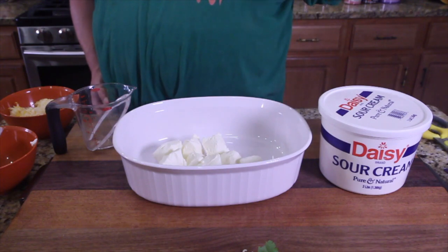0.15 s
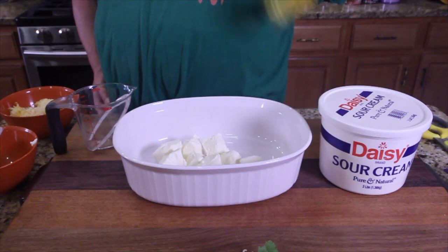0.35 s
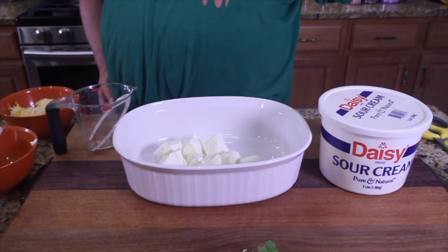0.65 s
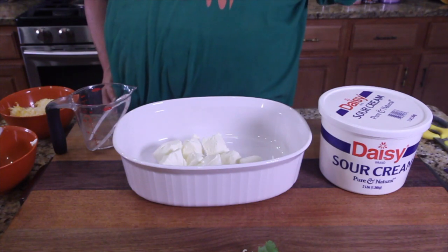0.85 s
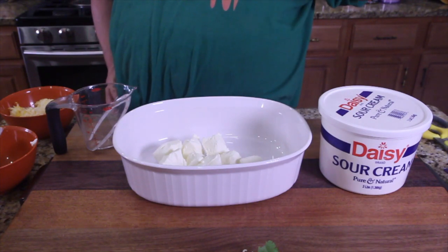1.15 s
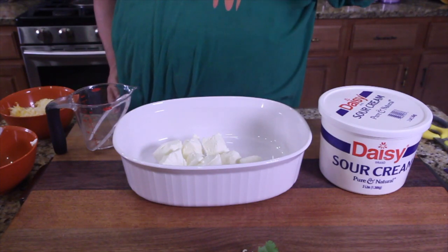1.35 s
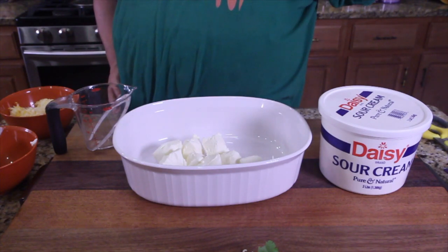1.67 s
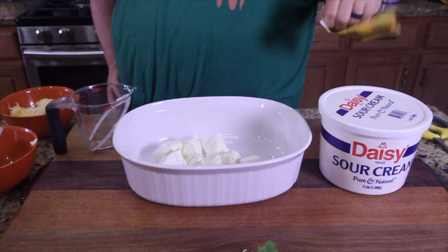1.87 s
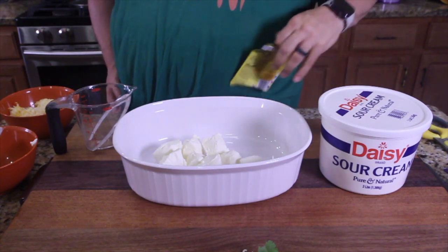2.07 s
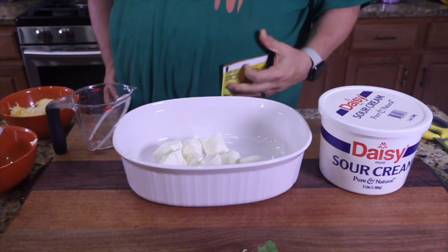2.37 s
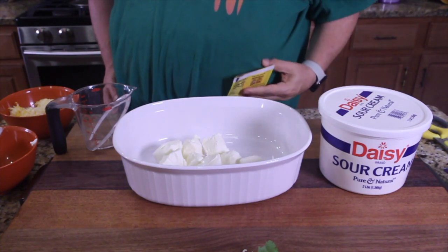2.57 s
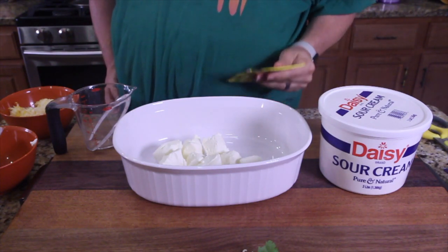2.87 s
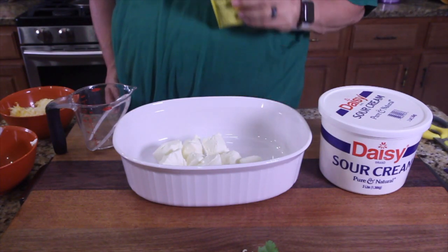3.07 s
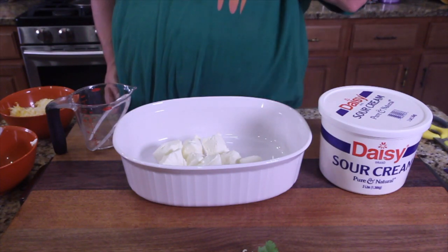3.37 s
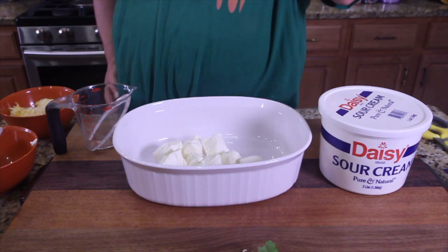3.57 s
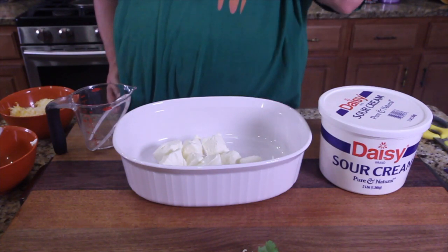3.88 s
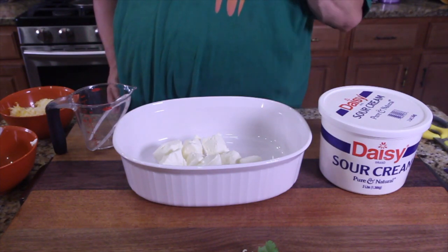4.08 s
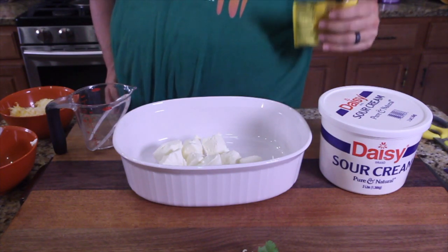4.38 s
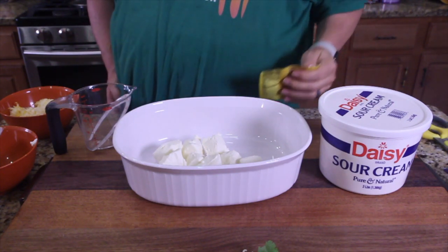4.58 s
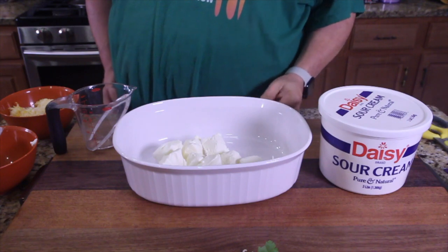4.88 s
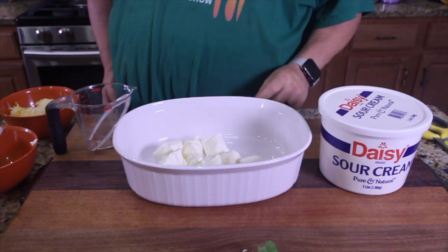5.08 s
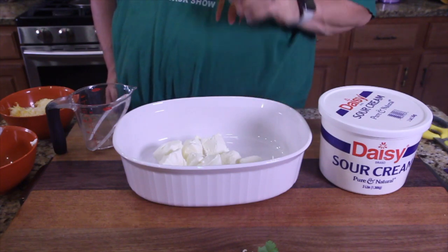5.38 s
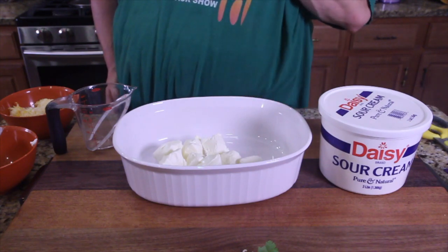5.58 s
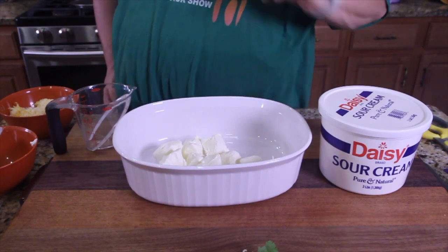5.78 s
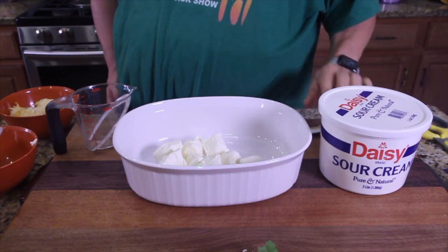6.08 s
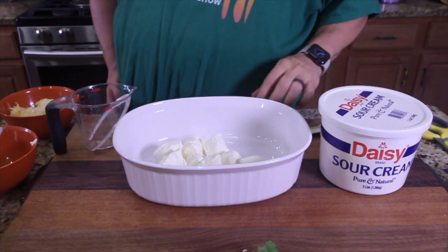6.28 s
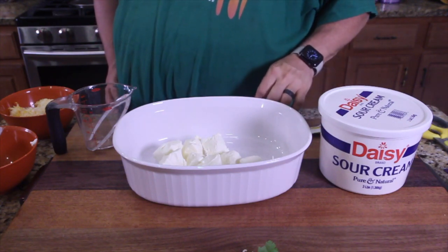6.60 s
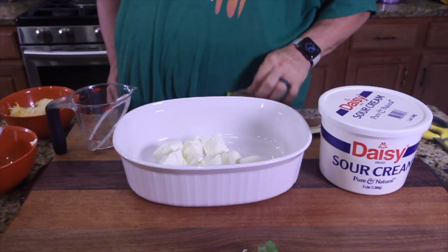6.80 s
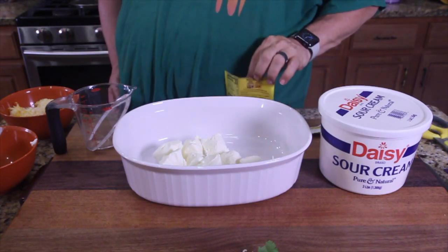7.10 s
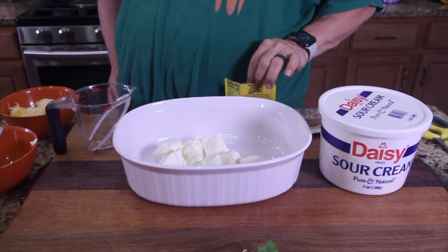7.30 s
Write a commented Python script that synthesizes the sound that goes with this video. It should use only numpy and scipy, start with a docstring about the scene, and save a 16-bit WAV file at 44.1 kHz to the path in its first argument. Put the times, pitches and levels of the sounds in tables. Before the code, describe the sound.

A paper packet of seasoning is shaken quickly for about two seconds, each stroke a sharp snap with a slap of powder inside. Quiet handling follows, with ticking creases and sliding powder, until the packet is torn open in one short, bright rip. A hand softly knocks and brushes a wooden board, and the paper crinkles again. The microphone is close, in a quiet home kitchen.

```python
"""Sharp paper snaps and the slap of powder: a packet is shaken close to one microphone in a home kitchen.
It is then handled quietly, its creases ticking and the powder sliding, and torn open at 4 s with a
bright rasp of parting fibres. As it is put down on the counter, a hand knocks and brushes a wooden
board. Behind it all, the kitchen answers with a short tail over a faint room noise."""
import sys
import numpy as np
from scipy import signal
from scipy.fft import rfft, irfft, next_fast_len
from scipy.io import wavfile

SR = 44100
rng = np.random.default_rng(int(sys.argv[2]) if len(sys.argv) > 2 else 0)


def output_pcm(signal):
    """Save a mono or channel-first signal as 16-bit PCM at the path in sys.argv[1].

    Samples are clipped to [-1, 1] before scaling.
    """
    pcm = np.clip(np.atleast_2d(signal).T, -1, 1) * 32767
    wavfile.write(sys.argv[1], SR, np.round(pcm).astype(np.int16))


N = 328545

# ends of the shake's strokes, up and down in turn: (time [s], level [dB], brightest frequency [Hz])
SHAKE_STROKES = [(0.1274, -8, 8000), (0.3093, -4.5, 4200), (0.4683, -5.5, 8100), (0.6494, -2.1, 5700),
                 (0.8119, -5, 7620), (.998, 0, 5000), (1.1652, -4, 5500), (1.3457, -1.66, 4000),
                 (1.505, -3, 5770), (1.686, 0.35, 3000), (1.8561, -9.5, 6700)]
# resonances of the packet's air pocket and walls: (frequency [Hz], width [Hz], gain [dB])
POCKET_MODES = [(210, 23, -3.5), (298, 52, -4.5), (380, 300, -5), (476, 120, -5), (612, 150, 1.5),
                (1040, 630, -5), (2000, 71, -2.5)]
# spectrum of paper and powder rubbing: (frequency [Hz], level per Hz [dB])
RUSTLE_SPECTRUM = [(71, -53.5), (120, -11.5), (308, -4.5), (445, -4), (670, -8), (773, -6.5), (1340, -6),
                   (1940, -4), (2480, -6), (8310, -5.5), (16000, -15.5)]


def snap_events(up_db=-3, taut_hollow_db=-25.5, buckle_lead_s=.0105, buckle_db=-14, buckle_hz=5000,
                buckle_hollow_db=3):
    """The paper snaps taut after each stroke and buckles before a down stroke ends; lone creases flip."""
    # lone creases, and one snap of fibres within the tear at 4.09 s: (time [s], level [dB], brightest frequency
    # [Hz], push on the hollow pocket [dB])
    creases = [(0.017, -10.5, 8400, -28), (0.1361, -5.5, 7990, -6), (0.2373, -21, 1574, -10),
               (0.2638, -18, 3236, -27.5), (0.356, -10.5, 9650, -36), (0.594, -15.5, 2002, -6),
               (0.7078, -9.5, 6680, -29.5), (0.771, -16.5, 7400, -14), (0.8319, -13, 5430, -17.5),
               (0.9209, -24.5, 1554, 10), (1.076, -14.5, 8920, -25.5), (1.239, -16.5, 2330, -30),
               (1.284, -15.5, 1610, -1), (1.4301, -19, 5180, -8), (1.5902, -15.5, 1800, -28.5),
               (1.6177, -15.5, 1610, -16), (1.632, -17, 1670, -19.5), (1.7485, -13.5, 6860, -24),
               (2.037, -34, 8200, -28), (2.0828, -30, 7600, -6), (2.1472, -27, 1990, 0.5),
               (2.2026, -30.5, 3000, -22), (2.2585, -25.5, 5670, -2), (2.3407, -33, 1930, -9),
               (2.405, -34, 1800, -16), (2.4818, -37.5, 4900, -23), (2.688, -26.5, 6600, -10),
               (2.722, -34, 5000, -19), (2.8198, -38, 1540, -31.5), (3.1582, -30, 6870, -26),
               (3.2294, -31.5, 6100, -10), (3.2969, -24.5, 1720, 1.5), (3.3841, -33.5, 1510, -3),
               (3.47, -32, 2510, -2.5), (3.5716, -40.5, 1950, 14.5), (3.6296, -34.5, 6200, -32.5),
               (3.8233, -25.5, 2360, 4.5), (3.8457, -26, 2300, -4.5), (3.919, -39, 1550, -2),
               (3.9323, -31, 2513, 2.5), (3.9873, -16, 5500, -2.5), (4.01, -27.5, 8600, -13),
               (4.0173, -3, 8260, -10.5), (4.0938, -15, 2740, -26), (4.6206, -46, 6100, -14.5),
               (4.9224, -37.5, 5400, -18), (5.1813, -28, 1580, -22.5), (5.355, -44, 1770, -20),
               (5.6387, -34, 5520, -6), (6.0395, -35.5, 4000, -18), (6.9348, -34.5, 6100, 1.5),
               (6.979, -38, 1820, 1), (6.991, -35, 2510, 5), (7.0336, -31, 7660, -12)]
    taut = [(s, db + up_db * (k % 2 == 0), hz, taut_hollow_db)
            for k, (s, db, hz) in enumerate(SHAKE_STROKES)]
    buckles = [(s - buckle_lead_s, db + buckle_db, buckle_hz, buckle_hollow_db)
               for s, db, _ in SHAKE_STROKES[1::2]]
    return taut + buckles + creases


def snaps(decay_s=0.00067, swell_s=0.00019, ragged=0.89, width_ratio=0.75, broad_db=-8, body_db=21,
          top_hz=11000, puff_db=-36, puff_s=0.005, deep_slope=0.17, uneven_db=4.0, dulling=0.12):
    """Each crease flips raggedly within a millisecond; it thumps the air pocket and puffs air."""
    t = np.arange(512) / SR
    envelope = np.exp(-t / decay_s) * (1 - np.exp(-t / swell_s))
    events = snap_events()
    impulse = t == t[12]
    bursts = (rng.standard_normal((len(events), len(t))) * ragged + impulse) * envelope
    bursts = butterworth(bursts, top_hz)
    puff = amp(puff_db) * t / puff_s * np.exp(1 - t / puff_s) * (1 - t / (2 * puff_s))
    cracks = np.zeros(N + len(t))
    push = np.full((len(POCKET_MODES), N + len(t)), 1e-18)
    # each crease sits elsewhere on the pocket and drives its modes differently
    reach_db = uneven_db * rng.standard_normal((len(events), len(POCKET_MODES)))
    is_deep = np.array(POCKET_MODES)[:, 0] < 500
    for (s, db, hz, hollow_db), burst, own_db in zip(events, bursts, reach_db):
        broad = amp(broad_db + dulling * db) * resonate(burst, 6400, 13000)
        crack = resonate(burst, hz, width_ratio * hz) + broad
        i = round(s * SR)
        cracks[i:i + len(t)] += amp(db) * (crack / np.abs(crack).max() + puff)
        # light creases move only a corner of the pocket and reach its deep tones less
        push[:, i] += amp(db + hollow_db + body_db) * amp(deep_slope * db * is_deep + own_db)
    return cracks[:N] + pocket(push[:, :N])


def landings(slide_lead_s=.073):
    """Every shower of powder as (time [s], strength [dB], rise [ms], t60 [ms])."""
    # the powder shifts as the packet is turned or gripped: (time [s], strength [dB])
    shifts = [(.0144, -35), (2.085, -28.5), (2.139, -29), (2.16, -29.5), (2.241, -23), (2.259, -30),
              (2.678, -33), (2.701, -43), (3.1584, -32), (3.226, -31), (3.2959, -36), (3.824, -32),
              (4.869, -40), (5.184, -37.5), (5.64, -36.5), (5.71, -41), (6.936, -36), (6.991, -25.5),
              (7.0338, -25), (7.047, -33), (7.3318, -37), (7.354, -36)]
    up = [(s, db - 5, 21, 110) for s, db, _ in SHAKE_STROKES[::2]]   # going up, it gathers more slowly
    down = [(s, db + 1, 13, 52) for s, db, _ in SHAKE_STROKES[1::2]]
    slides = [(s - slide_lead_s, db - 15, 13, 43) for s, db, _ in SHAKE_STROKES[1::2]]
    return up + down + slides + [(s, db, 3.1, 80) for s, db in shifts]


def powder_slaps(per_s=4400, spread_db=4.5, trim_db=-14, lag_s=0.002, hollow_db=-5, dulling=0.1,
                 light_hollow_db=4.0):
    """Powder hits the paper as a dense shower that swells and dies."""
    t = np.arange(SR // 2) / SR
    shower = np.zeros(N + len(t))
    for s, db, rise_ms, t60_ms in landings():
        rise_s = rise_ms / 1000
        i = max(round((s + lag_s - rise_s) * SR), 0)
        fall_db = -60 * np.maximum(t - rise_s, 0) * 1000 / t60_ms
        shower[i:i + len(t)] += amp(db + trim_db + fall_db) * np.minimum(t / rise_s, 1) ** 2
    hits = shower[:N] * colour(grains(per_s, spread_db), RUSTLE_SPECTRUM)
    # light showers carry less treble and more of the pocket
    lightness = 1 - (shower[:N] / shower.max()) ** dulling
    hits = hits - lightness * above(hits, 12000)
    return hits + amp(hollow_db + light_hollow_db * lightness) * pocket(hits)


def pocket(drive):
    """The hollow of the packet rings in parallel resonances, with one drive for all or one for each."""
    pushes = np.broadcast_to(drive, (len(POCKET_MODES), N))
    return sum((-1) ** k * amp(db) * resonate(pushes[k], hz, width)
               for k, (hz, width, db) in enumerate(POCKET_MODES))


def rip(per_s=5000, spread_db=2.5, flutter_db=1.0):
    """Fibres part too fast to count: a bright rasp that flutters, only while the tear runs."""
    # the tear running across and its fibres settling: (time [s], level [dB])
    tear = [(4.016, -15), (4.035, -32), (4.09, -30.5), (4.14, -31), (4.18, -42.5), (4.25, -50.5),
            (4.4, -62)]
    # spectrum of tearing paper: (frequency [Hz], level per Hz [dB])
    fibre_spectrum = [(180, -45), (300, -12.5), (593, -10.5), (1030, -9.5), (2570, -7.5), (7950, -2.5),
                      (16000, -11)]
    t = np.arange(N) / SR
    running = (t > tear[0][0]) & (t < tear[-1][0])
    envelope = running * amp(in_time(tear) + flutter_db * drift(60))
    return envelope * colour(grains(per_s, spread_db), fibre_spectrum)


def rustle(per_s=450, spread_db=4.0, clump_db=9.5, hiss_db=2.0, patch_db=1.5, patchier=0.62,
           width_ratio=0.26, brisk_db=-44, fuller_per_db=0.54, fullest_db=3.5):
    """Small creases crackle in clumps over the hiss of sliding powder; duller and patchier when slow."""
    # paper and powder in motion: (time [s], level [dB])
    motion = [(0, -39), (1.85, -39.5), (2.0, -52), (2.35, -55), (2.6, -66), (2.69, -50), (2.85, -64.5),
              (3.13, -68.5), (3.3, -61), (3.75, -71), (3.95, -52.5), (4.5, -69), (4.85, -67), (5.25, -69),
              (5.5, -75), (5.7, -64.5), (5.9, -69.5), (6.03, -64), (6.25, -76), (6.55, -67.5),
              (6.88, -69.5), (7.0, -52), (7.2, -62), (7.45, -63)]
    level_db = in_time(motion)
    full_db = np.clip(fuller_per_db * (brisk_db - level_db), 0, fullest_db)
    clicks = grains(per_s * amp(clump_db * drift(25)), spread_db) + 1e-18
    pitches = np.geomspace(1200, 11000, 7)
    pitch_index = rng.integers(0, len(pitches), N)
    crackle = sum(resonate(clicks * (pitch_index == k), hz, width_ratio * hz) * (pitches[-1] / hz) ** .25
                  for k, hz in enumerate(pitches))
    hiss = amp(hiss_db + (patch_db + patchier * full_db) * drift(12)) * rng.standard_normal(N)
    stream = colour(rms_one(crackle) + hiss, RUSTLE_SPECTRUM)
    low_lift = (amp(full_db) - 1) * butterworth(stream, 2500)
    treble_cut = (amp(-full_db) - 1) * above(stream, 7900)
    return amp(level_db) * (stream + low_lift + treble_cut)


def board(rub_db=-22, tick_db=-48, tick_s=0.0026, tick_hz=2484):
    """Soft knocks and a brushing hand excite the same wooden modes; skin ticks as it meets the wood."""
    # hand on the board: (time [s], push [dB], upper modes re lowest [dB], contact [ms])
    knocks = [(6.02, -45, 15, 0.78), (6.4, -26, -4, 1.66)]
    # modes of the board: (frequency [Hz], gain [dB], t60 [s])
    wood_modes = [(427, 1, 0.031), (510, -0.5, 0.049), (690, -11.5, 0.018), (895, -14, .03),
                  (1090, -13.5, 0.03), (2300, -28.5, .04)]
    # hand sliding on the board: (time [s], level [dB])
    brush = [(6.03, -80.5), (6.06, -66), (6.11, -81), (6.41, -77.5), (6.45, -59.5), (6.55, -56.5),
             (6.63, -58), (6.7, -78.5)]
    rubbing = rng.standard_normal(N) * amp(in_time(brush) + rub_db)
    t = np.arange(SR // 20) / SR
    wood = np.zeros(N)
    for k, (hz, db, t60) in enumerate(wood_modes):
        force = rubbing.copy()
        for s, push_db, upper_db, contact_ms in knocks:
            # the contact spreads over the board, so each mode swells before it dies
            swell = t * 1000 / contact_ms * np.exp(-t * 1000 / contact_ms)
            push = 2 * swell / swell.sum() * np.cos(2 * np.pi * hz * t)
            i = round(s * SR)
            force[i:i + len(t)] += amp(push_db + upper_db * (k > 0)) * push
        r, w = amp(-60 / (t60 * SR)), 2 * np.pi * hz / SR
        wood += amp(db) * signal.lfilter([0, np.sin(w)], [1, -2 * r * np.cos(w), r * r], force)
    ages = [np.arange(N) / SR - s for s, *_ in knocks]
    touch = sum((age > 0) * np.exp(-np.abs(age) / tick_s) for age in ages)
    ticks = amp(tick_db) * resonate(touch * rng.standard_normal(N), tick_hz, 2 * tick_hz)
    return butterworth(wood + ticks, 280, "high")   # a small board radiates no bass


def kitchen(near, build_s=.006, tail_db=-9.5, counter_s=0.0032, counter_db=-17.5):
    """A bounce off the counter reaches the microphone; a diffuse tail builds and dies band by band."""
    # decay of the kitchen: (frequency [Hz], t60 [s])
    decay_times = [(200, 0.31), (1000, 0.37), (4000, 0.28), (9000, 0.27), (15000, 0.067)]
    t = np.arange(SR) / SR
    edges_hz = 70 * 2 ** np.arange(0, 8.1, .5)
    white = rng.standard_normal((2, SR))
    tail = np.zeros(SR)
    for k, (low, high) in enumerate(zip(edges_hz, edges_hz[1:])):
        band = butterworth(white[k % 2], [low, high], "band")
        tail += band * amp(-60 * t / at_hz(decay_times, np.sqrt(low * high)))
    tail *= 1 - np.exp(-t / build_s)
    response = amp(tail_db) * tail / np.sqrt(np.sum(tail ** 2))
    response[round(counter_s * SR)] += amp(counter_db)
    return signal.fftconvolve(near, response)[:N]


def room_tone(level_db=-60.5, waver_db=1.0):
    """Faint, low noise of the room, wavering slightly in level."""
    # spectrum of the quiet kitchen: (frequency [Hz], level per Hz [dB])
    room_spectrum = [(15, -31.5), (30, -5), (52, -1.8), (76, -4), (123, 3.5), (166, -5), (326, -4.5),
                     (384, -1.5), (560, -8), (911, -10.5), (2690, -25.5), (8590, -30.5), (14800, -32.5),
                     (16000, -47.5)]
    return amp(level_db + waver_db * drift(3.8)) * colour(rng.standard_normal(N), room_spectrum)


def amp(db):
    """dB to gain."""
    return 10 ** (np.asarray(db) / 20)


def rms_one(x):
    """Scale to rms 1."""
    return x / np.sqrt(np.mean(x ** 2) + 1e-20)


def in_time(curve):
    """Read (time, value) rows at every sample."""
    return np.interp(np.arange(N) / SR, *np.transpose(curve))


def at_hz(points, hz):
    """Read (frequency, value) rows on a log-frequency axis."""
    frequencies, values = np.transpose(points)
    return np.interp(np.log(hz), np.log(frequencies), values)


def colour(x, spectrum):
    """Shape a steady stream by a spectrum; rms 1."""
    size = next_fast_len(N)
    hz = np.maximum(np.arange(size // 2 + 1) * SR / size, 1)
    return rms_one(irfft(rfft(x, size) * amp(at_hz(spectrum, hz)), size)[:N])


def resonate(x, hz, width_hz):
    """One resonance, gain 1 at its peak."""
    r = np.exp(-np.pi * width_hz / SR)
    feedback = [1, -2 * r * np.cos(2 * np.pi * hz / SR), r * r]
    return signal.lfilter((1 - r * r) / 2 * np.array([1, 0, -1]), feedback, x)


def butterworth(x, hz, kind="low", order=2):
    """Low-, high- or band-pass filter."""
    return signal.sosfilt(signal.butter(order, hz, kind, fs=SR, output="sos"), x)


def above(x, hz):
    """The treble that a gentle low-pass takes out."""
    return x - butterworth(x, hz, order=1)


def drift(rate_hz):
    """Smooth random wander; rms 1."""
    r = np.exp(-2 * np.pi * rate_hz / SR)
    return rms_one(signal.lfilter([1], [1, -2 * r, r * r], rng.standard_normal(N + SR))[SR:])


def grains(per_s, spread_db):
    """Clicks at random moments, of random sign and widely spread size; rms 1."""
    sizes = amp(spread_db * np.minimum(rng.exponential(1, N), 4)) * np.sign(rng.random(N) - .5)
    return rms_one(sizes * (rng.random(N) < per_s / SR))


def scene():
    """Packet and board close up, the kitchen and its room tone behind; mono."""
    near = snaps() + powder_slaps() + rustle() + rip() + board()
    return (near + kitchen(near) + room_tone())[None]


def record(dry):
    """Peaks are rounded just under full scale and the highest treble is cut."""
    ceiling, cutoff_hz = .88, 16700
    rounded = dry / (1 + (dry / ceiling) ** 4) ** .25
    return signal.sosfilt(signal.cheby2(14, 70, cutoff_hz, fs=SR, output="sos"), rounded)


dry = scene()
out = record(dry)
output_pcm(out)
```